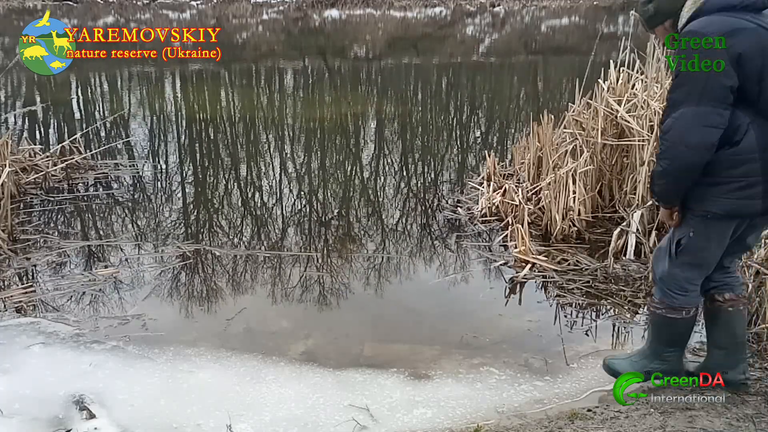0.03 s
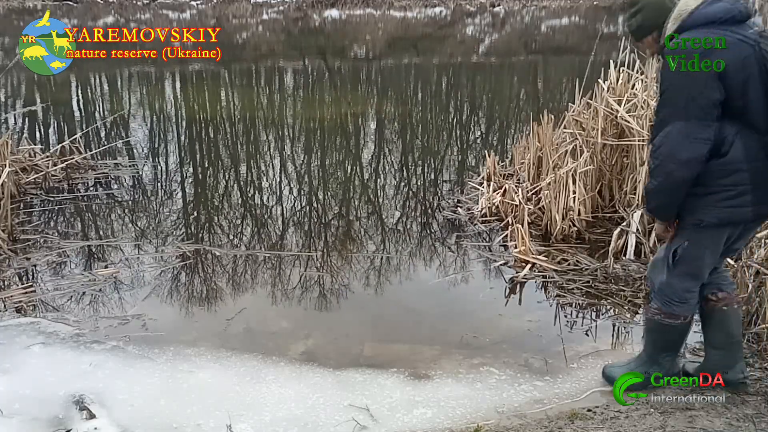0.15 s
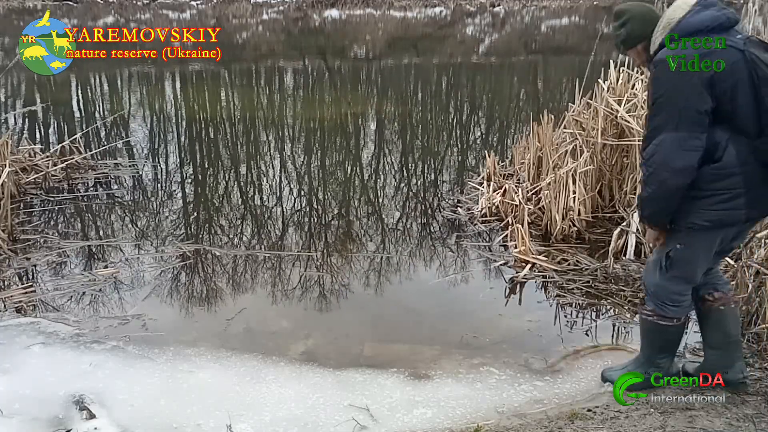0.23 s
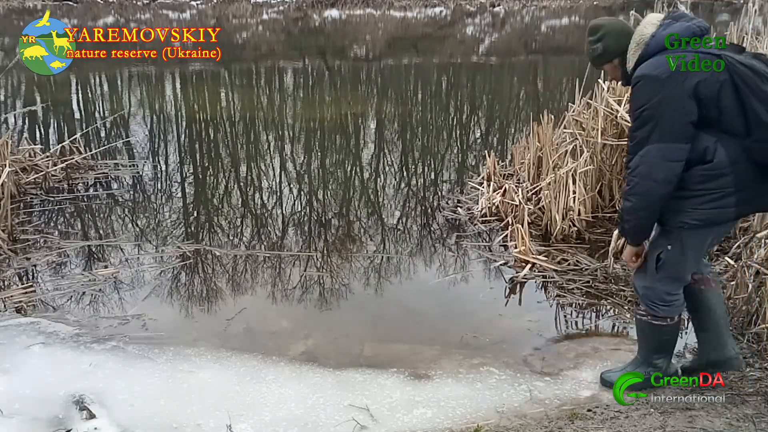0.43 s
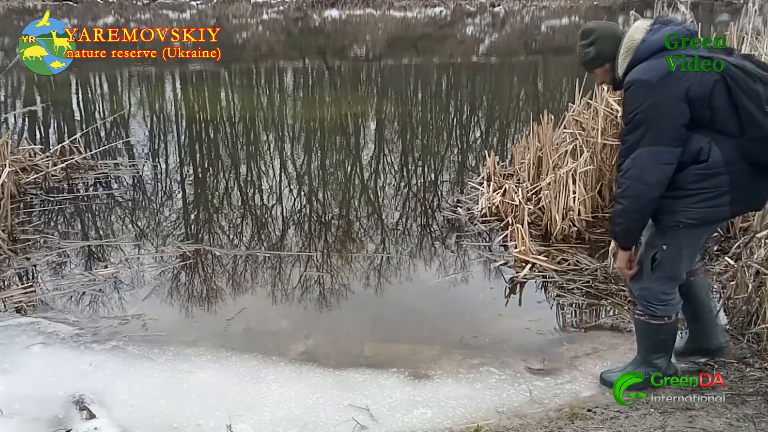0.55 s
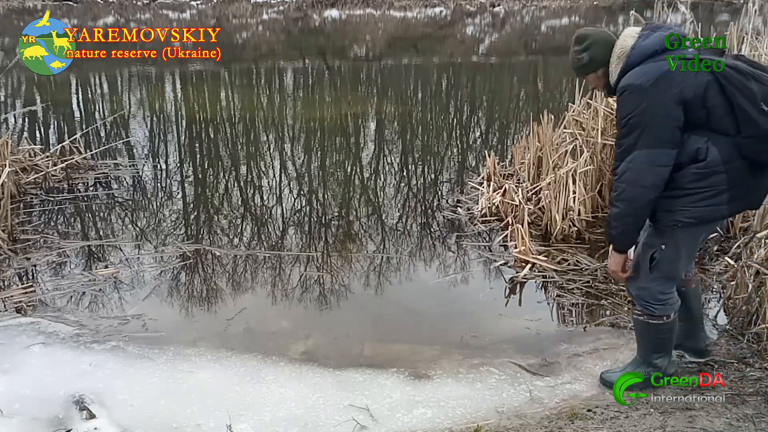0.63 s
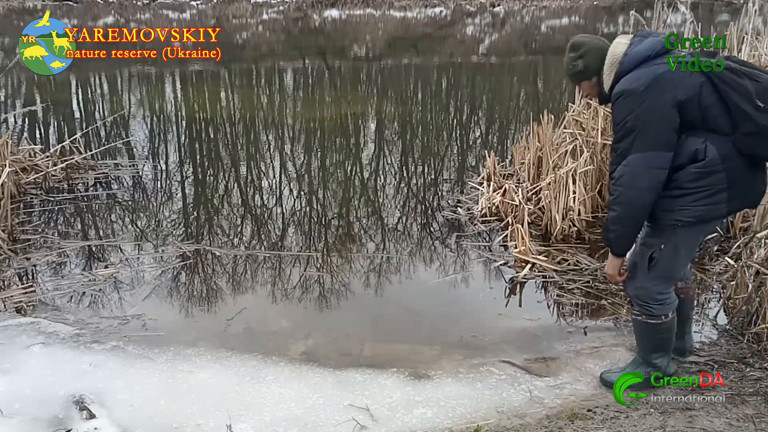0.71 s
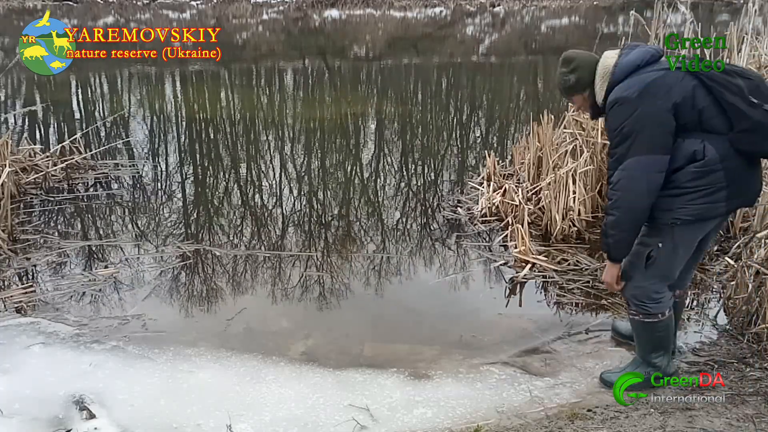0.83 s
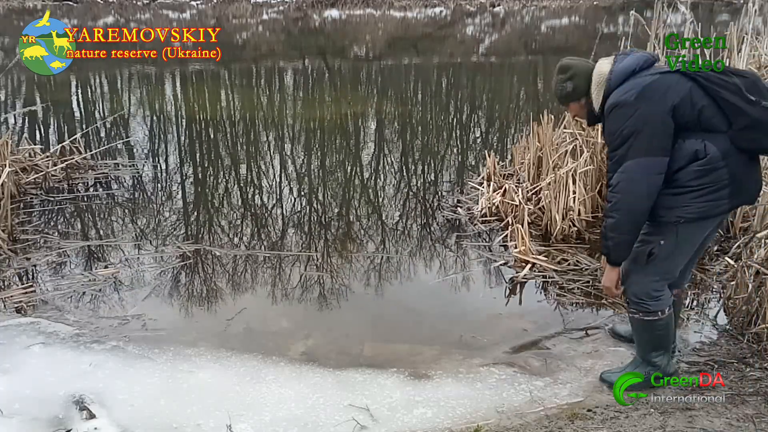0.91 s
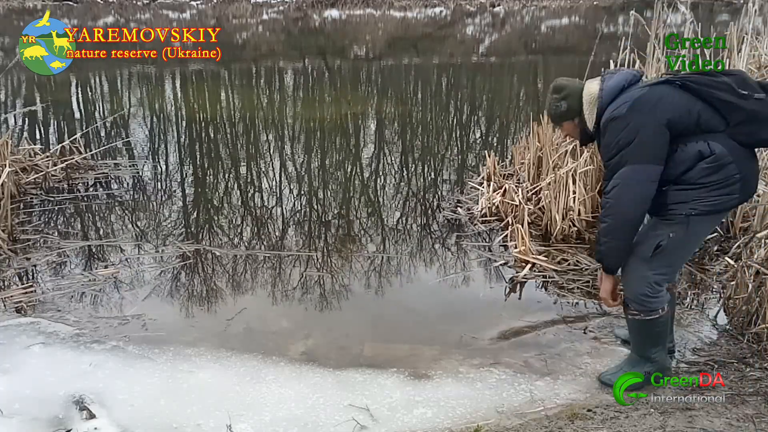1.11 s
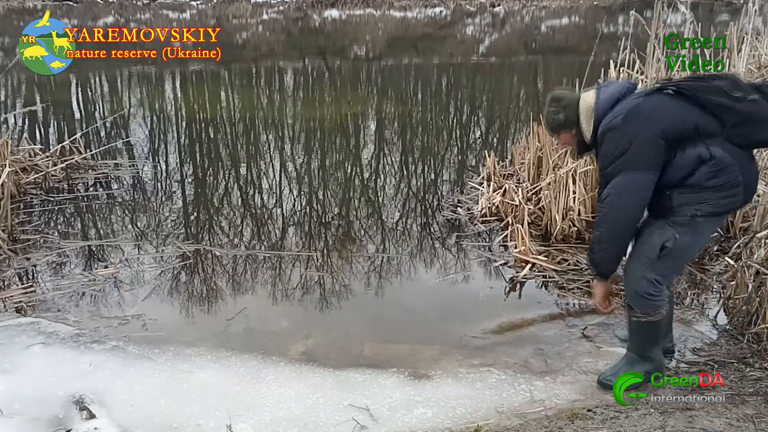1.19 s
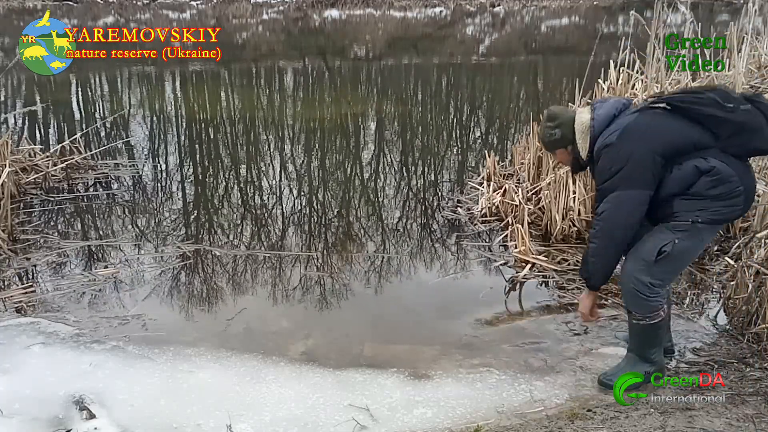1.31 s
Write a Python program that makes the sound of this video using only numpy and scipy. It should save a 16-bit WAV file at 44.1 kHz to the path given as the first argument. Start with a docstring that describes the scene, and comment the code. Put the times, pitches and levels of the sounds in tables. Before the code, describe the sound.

Slush and shallow water splashing as a stick stirs them, with wet ice cracking.

```python
"""At the edge of a pond, close to the microphone, a stick stirs slush and shallow water.
The first pushes throw spray: wet ice cracks, the water gulps with a falling pitch, air bubbles pop
and a brief froth fades as the water runs back. More pushes follow, with drops falling in between,
and a softer swish ends it. A short, faint echo follows everything, over a quiet hiss."""
import sys
import numpy as np
from scipy import signal
from scipy.fft import rfft, irfft
from scipy.io import wavfile

SR = 44100
rng = np.random.default_rng(int(sys.argv[2]) if len(sys.argv) > 2 else 0)


def transcribe(signal):
    """Save signal, clipped to [-1, 1], as a 16-bit WAV file at the path in sys.argv[1]."""
    frames = np.atleast_2d(signal).T
    limited = np.clip(frames, -1, 1)
    pcm = np.round(limited * 32767).astype(np.int16)
    wavfile.write(sys.argv[1], SR, pcm)


N = 59535
T = np.arange(N) / SR
FREQS = np.maximum(np.fft.rfftfreq(N, 1 / SR), 1)


def amp(db):
    """Decibels to gain."""
    return 10 ** (np.asarray(db) / 20)


def unit(x):
    """Scale to rms 1."""
    return x / np.sqrt(np.mean(x ** 2))


def coloured_noise(spectrum):
    """Noise of rms 1, shaped by (frequency_hz, relative_db) points."""
    hz, db = np.array(spectrum).T
    gain = amp(np.interp(np.log(FREQS), np.log(hz), db))
    return unit(irfft(rfft(rng.standard_normal(N)) * gain, N))


def band_noise(centre_hz, width_octaves):
    """Noise of rms 1 in one bell-shaped band."""
    bell = np.exp(-.5 * (np.log2(FREQS / centre_hz) / width_octaves) ** 2)
    return unit(irfft(rfft(rng.standard_normal(N)) * bell, N))


def swell(start_s, rise_s, hold_s, decay_s):
    """Smooth rise, hold and exponential decay."""
    age = T - start_s
    attack = np.sin(np.pi / 2 * np.clip(age / rise_s, 0, 1)) ** 2
    return attack * np.exp(-np.maximum(age - rise_s - hold_s, 0) / decay_s)


def pop(age, peak_s):
    """A rounded attack that reaches 1 at peak_s and dies away."""
    progress = np.maximum(age, 0) / peak_s
    return (progress * np.exp(1 - progress)) ** 2


def splashes():
    """Each push moves a body of water, sloshes its surface and throws spray; droplets make it flutter."""
    # pushes: start_s, rise_s, hold_s, decay_s, body_db, slosh_db, spray_db, tilt_db_per_octave, flutter_db
    pushes = [(0.123, .03, 0.098, 0.011, -81, -78, -71.5, -5, 8),
              (0.1977, 0.012, 0.0032, 0.013, -34, -28.5, -28.5, -0.5, 4.5),
              (0.2388, 0.001, 0.0039, 0.0083, -24.5, -21.5, -23.5, -6, 4),
              (0.2599, 0.00064, 0.0021, 0.013, -28.5, -24, -24.5, -1.5, 12.5),
              (0.276, .003, 0.0061, 0.012, -28, -33, -29.5, 5, 8.5),
              (0.298, 0.0077, 0.0067, .05, -59.5, -37.5, -37.5, -2, 1.5),
              (0.345, 0.0098, 0.0033, 0.017, -40, -34, -37.5, -8.5, 4.5),
              (0.376, 0.0067, 0.0059, 0.047, -61, -50, -42, -6, 2),
              (0.4411, 0.0047, 0.0085, 0.0026, -81, -37, -32.5, -2.5, 1.5),
              (0.46, 0.0064, 0.017, 0.035, -86, -43.5, -43.5, -5, -4),
              (0.511, 0.0096, 0.01, 0.0047, -46, -39.5, -38.5, 1, 4),
              (0.606, 0.036, 0.028, 0.11, -70, -69.5, -61, -1.5, 4),
              (.785, 0.021, 0.0096, 0.02, -61.5, -58, -36, 2, 2),
              (0.854, 0.015, 0.011, 0.0085, -32.5, -48.5, -29, 2, 1),
              (0.876, 0.0041, 0.036, 0.0085, -69, -53.5, -41.5, -3, 2.5),
              (0.962, 0.055, 0.026, 0.039, -79.5, -66.5, -54.5, -8, 1),
              (1.074, 0.038, 0.0047, 0.037, -73, -52.5, -48, -1.5, -0.5),
              (1.103, 0.028, 0.038, 0.042, -39, -40.5, -41.5, -3.5, 2),
              (1.198, 0.044, .12, 0.043, -66, -60, -51.5, -1, 2)]
    # spectra of the low body, mid slosh and high spray: frequency_hz, relative_db
    body_colour = [(30, -40.5), (60, -35.5), (95, -6.5), (135, 0.5), (220, -5), (450, -6.5), (800, -9.5),
                   (1500, -39), (4000, -58)]
    slosh_colour = [(120, -32.5), (400, -1.5), (750, 1.5), (1300, 2.5), (2100, 0.5), (3200, -12.5),
                    (5000, -23.5), (14000, -31.5)]
    spray_colour = [(500, -38), (2000, -9.5), (3300, -10.5), (4400, -4.5), (5300, -4.5), (6500, 1.5),
                    (8000, -5), (9700, -5), (11500, -16), (15000, -25.5)]
    body = coloured_noise(body_colour)
    slosh = coloured_noise(slosh_colour)
    spray_spectrum = rfft(coloured_noise(spray_colour))
    spatter = np.clip(band_noise(centre_hz=245, width_octaves=.98), -2, 2)
    octaves = np.log2(np.maximum(FREQS / 3000, 1))  # the spray tilts above 3 kHz
    out = np.zeros(N)
    for *timing, body_db, slosh_db, spray_db, tilt, flutter_db in pushes:
        spray = unit(irfft(spray_spectrum * amp(tilt * octaves), N))
        surface = amp(slosh_db) * slosh + amp(spray_db) * spray
        flutter = unit(amp(flutter_db * spatter))
        water = amp(body_db) * body + surface * flutter
        out += swell(*timing) * np.roll(water, rng.integers(N))
    return out


def cracks(top_hz=11000):
    """Wet ice snaps in milliseconds, each crack with its own brightness, and a falling drop ticks once at 0.472
    s; the water dulls their top."""
    # snaps: start_s, peak_rms_db, peak_s, centre_hz, width_octaves
    snaps = [(0.2045, -24, 0.0012, 1970, 0.18), (0.2409, -21, 0.00046, 4270, .6),
             (0.2518, -15, 0.00046, 4800, 0.88), (0.2615, -12.5, 0.00056, 2110, 0.26),
             (0.2745, -22.5, .0006, 4900, 0.63), (0.2785, -7, 0.00047, 2590, 0.57),
             (0.2919, -16, 0.00067, 1700, 0.19), (0.3039, -24, 0.0024, 6340, 0.28),
             (0.4721, -28.5, 0.00091, 1520, .4), (0.516, -22.5, 0.001, 5000, 1.0),
             (0.52, -18, 0.00066, 7220, 0.23), (0.5296, -26, 0.00036, 4500, 0.74),
             (0.625, -49, 0.0042, 5490, .5), (0.6947, -52, 0.00093, 10040, .3),
             (0.977, -47.5, .004, 5000, 0.21), (1.018, -50, .002, 2700, 0.33),
             (1.2709, -35, 0.00075, 8850, 0.19)]
    out = np.zeros(N)
    for start_s, peak_rms_db, peak_s, centre_hz, width_octaves in snaps:
        envelope = pop(T - start_s, peak_s)
        snap = unit(envelope * band_noise(centre_hz, width_octaves))
        out += amp(peak_rms_db) * np.sqrt(np.mean(envelope ** 2)) * snap
    return signal.sosfilt(signal.butter(4, top_hz, fs=SR, output="sos"), out)


def gulps(decay_s=.0085):
    """Water closes round the stick, and the note of the cavity drops quickly."""
    # cavities: start_s, first_hz, last_hz, fall_s, rise_s, hold_s, level_db
    cavities = [(0.2067, 400, 122, 0.0035, 0.0011, 0.011, -24), (0.2397, 757, 95, .008, .001, 0.011, -26.5),
                (0.5158, 797, 82.7, 0.0075, 0.00083, 0.0076, -27.5),
                (.868, 251.3, 155, .005, 0.0011, 0.0026, -23.5)]
    out = np.zeros(N)
    for start_s, first_hz, last_hz, fall_s, rise_s, hold_s, level_db in cavities:
        age = np.maximum(T - start_s, 0)
        cycles = last_hz * age + (first_hz - last_hz) * fall_s * (1 - np.exp(-age / fall_s))
        out += amp(level_db) * swell(start_s, rise_s, hold_s, decay_s) * np.sin(2 * np.pi * cycles)
    return out


def air_pocket(start_s, pitch_hz, peak_db, peak_s, glide_octaves_per_s):
    """One pocket of air rings briefly in the water as its pitch glides."""
    first = int(start_s * SR)
    age = T[:min(int(10 * peak_s * SR), N - first)]
    hz = pitch_hz * 2 ** (glide_octaves_per_s * age)
    ring = amp(peak_db) * pop(age, peak_s) * np.sin(2 * np.pi * np.cumsum(hz) / SR)
    return np.pad(ring, (first, N - first - len(ring)))


def bubbles():
    """Single bubbles and falling drops ring, some gliding up and some down."""
    # bubbles and drops: start_s, pitch_hz, peak_db, peak_s, glide_octaves_per_s
    pockets = [(0.2116, 522, -14.5, .0024, -57.5), (0.243, 540, -22.5, 0.0023, -9.5),
               (0.2681, 1840, -9.5, 0.0009, -10), (0.2791, 1100, -5, 0.0011, 11),
               (.2830, 1150, -17.5, 0.0013, -12), (.353, 378, -29.5, 0.0046, 23),
               (.360, 767, -27, .003, -15), (0.377, 1046, -36, 0.0086, 19), (0.394, 984, -26.5, 0.0028, -9),
               (.412, 477, -37.5, 0.0061, 24), (.4255, 1740, -46, 0.0019, 7),
               (0.4412, 462, -32.5, 0.0061, 40.5), (.4718, 1960, -27.5, 0.0015, 13),
               (.473, 750, -30.5, 0.0042, 18.5), (0.487, 850, -37.5, 0.0027, -5),
               (0.5098, 877, -22.5, 0.0014, 12), (0.53, 1150, -35, 0.0027, 24),
               (0.5731, 8930, -40, .0012, -13), (0.5892, 940, -43, 0.0023, 15),
               (.6294, 4100, -41, 0.0017, 3.5), (0.6302, 6060, -38, .001, -6.5),
               (0.659, 2360, -43.5, .001, 8), (0.66, 529, -50.5, 0.0046, -2.5),
               (0.674, 2226, -41.5, 0.0016, 1), (0.6815, 2273, -35.5, 0.0015, -7.5),
               (0.6947, 2273, -41.5, 0.0012, 4.5), (.843, 586.5, -36.5, 0.018, 4),
               (.863, 825, -24, 0.0026, -10.5), (0.858, 1664, -38, 0.005, -1.5),
               (0.9774, 5590, -35.5, 0.002, -3), (0.9791, 4550, -37.5, 0.0013, 0.5),
               (1.017, 2194, -40.5, 0.0028, 15.5), (1.038, 4430, -44.5, 0.0016, 20.5),
               (1.108, 806, -35.5, 0.011, -3), (1.123, 509, -33.5, 0.0075, 6)]
    return sum(air_pocket(*pocket) for pocket in pockets)


def froth(count=55, start_s=.285, length_s=.2, level_db=-38, fade_db_per_s=55.5):
    """The first splashes stir up a fading swarm of small bubbles, each rising in pitch."""
    centre_hz, spread_octaves, spread_db, cycles_to_peak = 1700, .55, 5, 2
    delays_s = rng.random(count) * length_s
    deviations = np.clip(rng.standard_normal((count, 2)), -2, 2)
    out = np.zeros(N)
    for delay_s, (pitch, strength) in zip(delays_s, deviations):
        hz = centre_hz * 2 ** (spread_octaves * pitch)
        peak_db = level_db - fade_db_per_s * delay_s + spread_db * strength
        out += air_pocket(start_s + delay_s, hz, peak_db, cycles_to_peak / hz, glide_octaves_per_s=18)
    return out


def gurgles():
    """Water running back sounds soft hollow notes and one faint high ring."""
    # notes: start_s, rise_s, hold_s, decay_s, centre_hz, width_octaves, level_db
    notes = [(0.373, 0.01, 0.032, 0.014, 357, 0.091, -46.5), (0.896, 0.015, 0.018, .02, 578, 0.19, -58.5),
             (1.029, .04, 0.16, 0.073, 4360, 0.021, -59.5), (1.25, 0.053, .05, .05, 580, 0.23, -50.5)]
    return sum(amp(level_db) * swell(*timing) * band_noise(centre_hz, width_octaves)
               for *timing, centre_hz, width_octaves, level_db in notes)


def echo(direct, delay_s=.0028):
    """Close reflections and a fainter diffuse tail reach the microphone after the direct sound."""
    # spectrum of the reflections: frequency_hz, relative_db
    echo_colour = [(60, -7.5), (130, 4.5), (260, -7), (600, -1), (2000, -1), (5000, 6.5), (9000, -1),
                   (15000, 0)]
    early_db, early_t60_s, tail_db, tail_t60_s = -14.5, .11, -21.5, .29
    scatter = coloured_noise(echo_colour) * np.clip(T / delay_s - 1, 0, 1)
    early = amp(early_db) * unit(scatter * amp(-60 * T / early_t60_s))
    tail = amp(tail_db) * unit(scatter * amp(-60 * T / tail_t60_s))
    return signal.fftconvolve(direct, (early + tail) / np.sqrt(N))[:N]


def hiss(level_db=-71):
    """A quiet, steady noise floor lies under the water."""
    # spectrum of the background: frequency_hz, relative_db
    hiss_colour = [(30, 3), (100, 7.5), (300, -1.5), (900, -5), (3000, -8.5), (6300, -4), (9000, -12),
                   (13400, -9), (14200, -30.5)]
    return amp(level_db) * coloured_noise(hiss_colour)


def scene():
    """Water and ice close to one microphone, with their echo and the background hiss."""
    water = splashes() + gulps() + bubbles() + froth() + cracks() + gurgles()
    return (water + echo(water) + hiss())[None]


def record(dry, low_cut_hz=98, top_hz=15000):
    """The recorder thins the deep bass, clips at full scale and cuts the top."""
    low_cut = signal.butter(2, low_cut_hz, "high", fs=SR, output="sos")
    high_cut = signal.ellip(8, .2, 90, top_hz, fs=SR, output="sos")
    thinned = signal.sosfilt(low_cut, dry)
    return signal.sosfilt(high_cut, np.clip(thinned, -1, 1))


dry = scene()
out = record(dry)
transcribe(out)
```